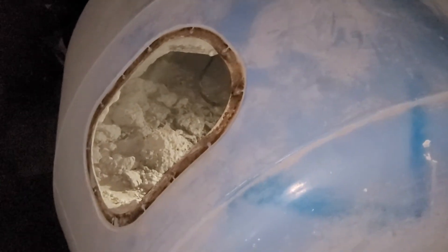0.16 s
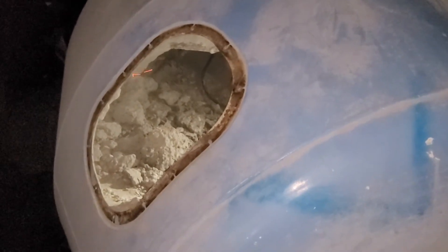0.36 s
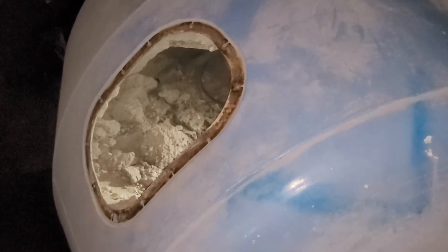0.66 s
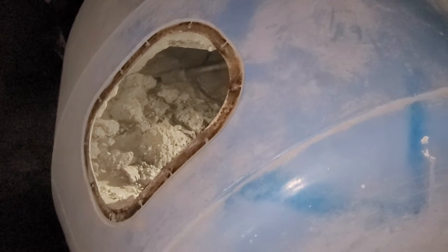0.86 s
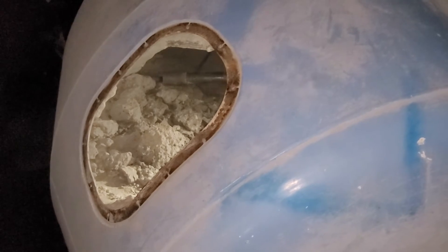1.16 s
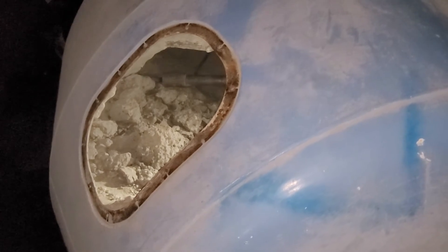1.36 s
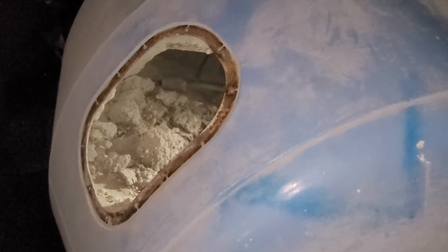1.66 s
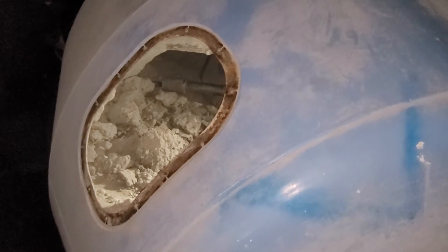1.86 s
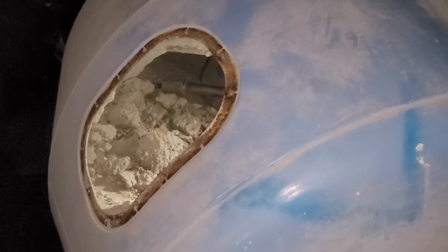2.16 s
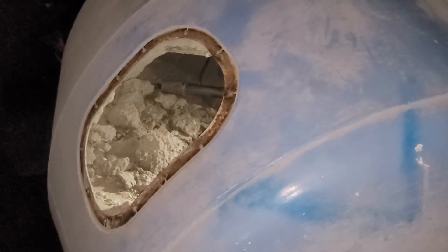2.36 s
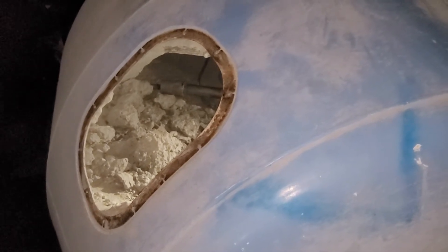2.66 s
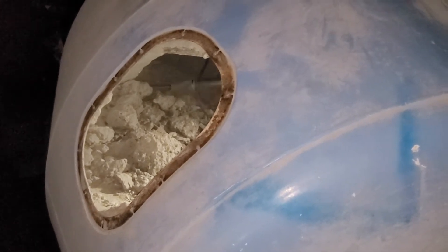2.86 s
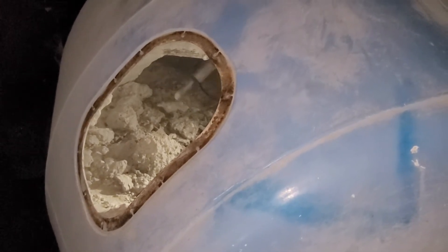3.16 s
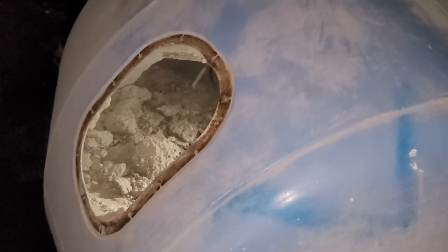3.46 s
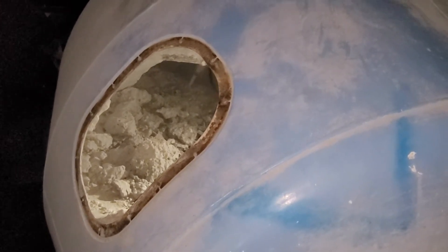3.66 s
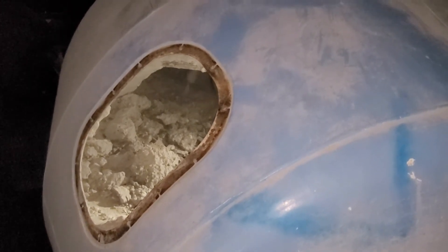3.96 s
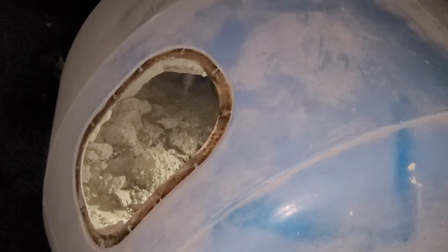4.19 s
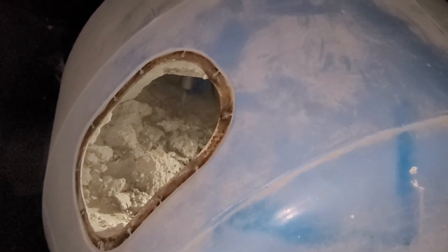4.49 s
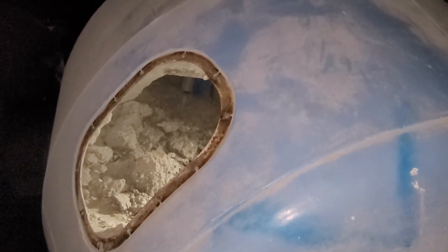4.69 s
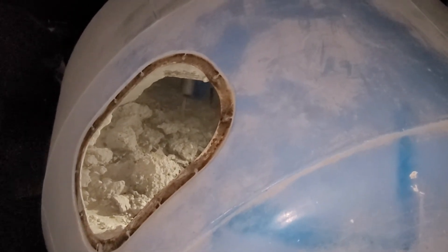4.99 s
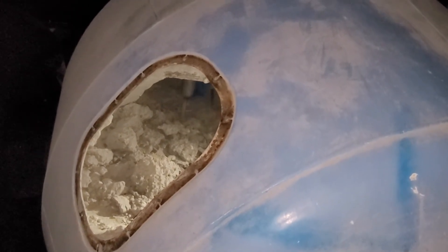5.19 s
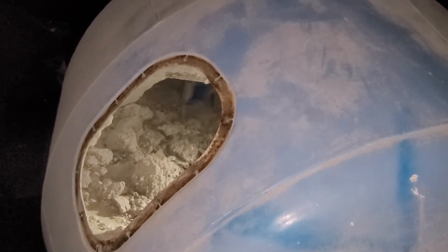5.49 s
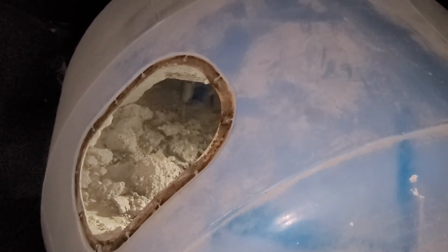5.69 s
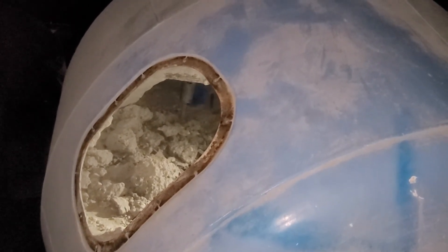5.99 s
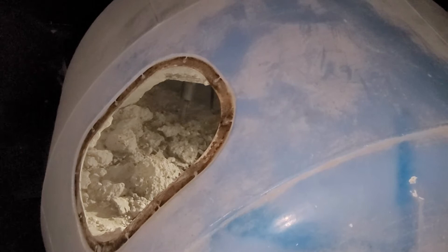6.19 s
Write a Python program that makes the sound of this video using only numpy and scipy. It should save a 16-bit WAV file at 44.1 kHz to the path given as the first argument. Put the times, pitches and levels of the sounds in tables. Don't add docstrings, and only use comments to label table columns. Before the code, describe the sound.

Loud, harsh jackhammer blows ring and boom in a metal mixer drum for half a second, then cut off. The low engine hum and thin hiss gradually come up over about two seconds. The valve groans, the chisel rattles unevenly, then settles into steady rapid hammering that stops abruptly. The engine returns briefly before hammering resumes. Close outdoor recording, short metallic echo, slightly squashed peaks.

```python
import sys
import numpy as np
from scipy import signal
from scipy.fft import rfft, irfft, next_fast_len
from scipy.io import wavfile
from scipy.ndimage import uniform_filter1d

SR = 44100
rng = np.random.default_rng(int(sys.argv[2]) if len(sys.argv) > 2 else 0)


def linear_from_db(decibels):
    return 10 ** (np.asarray(decibels, float) / 20)


def wav_out(sig):
    wavfile.write(sys.argv[1], SR, np.round(np.clip(np.atleast_2d(sig).T, -1, 1) * 32767).astype(np.int16))


N = 279594
SIZE = next_fast_len(N)
TIME = np.arange(N) / SR
TOOL_LAG, YARD_LAG = 2.66, -12.5

# start_s, peak_db
REBOUNDS = [(0.0204, -27), (0.063, -25), (0.1304, -21), (0.4278, -6), (2.6927, -5), (2.7394, -23),
            (2.8012, -10), (2.828, -10), (2.8624, -5), (2.895, -8), (2.9327, -10), (2.961, -18),
            (3.0094, -24), (3.034, -11), (6.1589, -5.5)]


def rms_one(x):
    return x / np.sqrt(np.mean(x ** 2) + 1e-20)


def in_time(spans, off_db=None):
    rows = []
    for span in spans:
        if off_db is None:
            rows += list(span)
            continue
        quiet = [off_db] * (len(span[0]) - 1)
        before = (span[0][0] - 1e-3, *quiet)
        after = (span[-1][0] + 1e-3, *quiet)
        rows += [before, *span, after]
    s, *columns = np.transpose(rows)
    return [np.interp(TIME, s, c) for c in columns]


def pair(alike, lag, gain=1):
    real, imag = rng.standard_normal((2, 3, SIZE // 2 + 1))
    shared, left, right = (real + 1j * imag) * gain
    late = shared * np.exp(-2j * np.pi * np.arange(SIZE // 2 + 1) * lag / SIZE)
    alike = np.clip(alike, 0, 1)
    both = np.sqrt(alike) * np.array([shared, late]) + np.sqrt(1 - alike) * np.array([left, right])
    return rms_one(irfft(both, SIZE)[:, :N])


def coloured(points, alike, lag):
    hz = np.maximum(np.arange(SIZE // 2 + 1) * SR / SIZE, 1)
    point_hz, point_db = np.transpose(points)
    gain = linear_from_db(np.interp(np.log(hz), np.log(point_hz), point_db))
    return pair(alike, lag, gain)


def drift(rate):
    r = np.exp(-80 * np.pi * rate / SR)
    slow = signal.lfilter([1], [1, -2 * r, r * r], rng.standard_normal(N // 40 + 2002))[2000:]
    return np.interp(np.arange(N) / 40, np.arange(len(slow)), rms_one(slow))


def ring(x, hz, t60):
    r, w = linear_from_db(-60 / (t60 * SR)), 2 * np.pi * hz / SR
    return signal.lfilter([0, np.sin(w)], [1, -2 * r * np.cos(w), r * r], x + 1e-18)


def marks(times, levels_db):
    out = np.zeros(N)
    at = np.minimum((np.asarray(times) * SR).astype(int), N - 1)
    np.add.at(out, at, linear_from_db(np.asarray(levels_db)))
    return out


def burst(clicks, hold_s, t60):
    hold = int(hold_s * SR)
    width = 2 * hold + 1
    held = uniform_filter1d(clicks, width, mode="constant") * width
    held = np.concatenate([np.zeros(hold), held])[:N]
    r = linear_from_db(-60 / (t60 * SR))
    tail = signal.lfilter([1], [1, -r], clicks + 1e-18)
    return held + np.concatenate([np.zeros(width), tail])[:N]


def throttle():
    # opens_s, piston_going_s, shuts_s, surge_db, steady_db
    pulls = [
        (-.2, -.1, .505, -20, -18.5),
        (2.624, 2.697, 5.39, -10, -13.5),
        (6.098, 6.155, 6.5, -12, -18.5),
    ]
    surge_rise_db, surge_fall_db_per_s, refill_s, shut_db_per_s = 16.5, 270, 0.06, 500
    air_db, work_db, since = np.full(N, -90.), np.full(N, -90.), np.full(N, np.inf)
    for opens, going, shuts, surge_db, steady_db in pulls:
        gate_db = np.minimum(shut_db_per_s * np.minimum(shuts - TIME, 6.0 * (TIME - opens)), 0)
        rise_db = -surge_rise_db * (going - TIME) / (going - opens)
        surge = linear_from_db(surge_db + np.minimum(rise_db, -surge_fall_db_per_s * (TIME - going)))
        steady = linear_from_db(steady_db) * (1 - np.exp(-np.maximum(TIME - going, 0) / refill_s))
        air_db = np.maximum(air_db, gate_db + 20 * np.log10(surge + steady + 1e-9))
        work_db = np.maximum(work_db, gate_db + np.minimum(2 * rise_db, 0))
        running_or_before = np.where(TIME > going, 0, since)
        since = np.where(TIME > shuts, TIME - shuts, running_or_before)
    return air_db, work_db, since


def blows():
    # start_s, peak_db, ring_db, middle_db
    short = [(0.0447, -1, 0, -16), (0.114, -4.5, -2.5, -15), (0.19, -4.5, 0.5, -13), (0.2688, -2, 0, -18),
             (0.3384, -4.5, -1, -24), (0.4173, -1.5, -3, -7), (0.4946, -5.5, -15, -22), (6.1764, -8, -4, 1),
             (6.2573, -4.5, 3, -23), (6.3314, -6.5, -8, -16)]
    # start_s, peak_db, ring_db, middle_db
    hunting = [(2.7154, -4, -10, -21), (2.7873, -4, 2, -23), (2.8536, -2.5, 4.5, -23), (2.9206, -3, 5, -9),
               (2.993, -2.5, 1.5, -3), (3.07, -3, -1.5, -5), (3.144, -1.5, -5.5, -26),
               (3.2089, -1, -7.5, -26), (3.2748, -3.5, -7.5, -25), (3.345, -5, -7.5, -13),
               (3.4096, -1.5, -11, -26), (3.4754, -2, -2.5, -26), (3.554, -5, -6, -30),
               (3.6169, 1, -14, -31), (3.68, -3.5, -4, -6), (3.7564, -10, 3, 5), (3.8385, -0.5, -2, -10),
               (3.9099, -14.5, -1, 9), (3.9915, -7.5, -9, -2), (4.0721, -5, -4.5, -1.5),
               (4.1507, -2, -3, -23), (4.2228, -7.5, -12, -13), (4.2957, -7, -3.5, -7),
               (4.3782, -5.5, 1, -11)]
    from_s, period_s, count = 4.4538, 0.07698, 13
    even = [(from_s + k * period_s, -6, -5, -13.5) for k in range(count)]
    return np.array([*short, *hunting, *even])


def yard_levels():
    duck_db, recover_s, engine_share, rumble_dies_db_per_s = 14.5, 0.9, 0.63, 50
    since = throttle()[2]
    ducked_db = -duck_db * np.exp(-since / recover_s)
    engine_db = -27.5 + engine_share * ducked_db
    rumble_db = np.maximum(engine_db, -26.5 - rumble_dies_db_per_s * since)
    hiss_db = np.maximum(-37.5 + ducked_db, -46.5 - 4.0 * rumble_dies_db_per_s * since)
    return uniform_filter1d(np.array([engine_db, rumble_db, hiss_db]), int(0.042 * SR))


def yard():
    # multiple, level_db
    orders = [(1, -13), (2, 3), (3, -8), (4, -14), (5, -10), (6, -18), (8, -3.5), (9, -8.5), (11, -11),
              (12, -15.5), (12.6, -6), (19, -20)]
    # pitch_hz, level_db
    whines = [(1130, -67), (1238, -59.5), (1384, -59.5), (1497, -64.5), (1550, -65), (1949, -59.5),
              (2137, -64.5)]
    # freq_hz, density_db [dB per Hz]
    rumble_colour = [(18, -27.5), (30, -21), (59, 4), (81, -6.5), (171, -21.5), (191, -8.5), (213, -7.5),
                     (287, -11.5), (345, -4), (386, -17.5), (684, -12.5), (920, -23), (2500, -27.5),
                     (3250, -58), (5500, -120)]
    # freq_hz, density_db [dB per Hz]
    hiss_colour = [(1180, -8), (2000, -17), (2050, -25), (2760, -9), (2960, -7), (3340, -13), (5680, -16.5),
                   (7840, -19.5), (11700, -13), (16000, -22.5)]
    firing_hz, split_hz, alike_low, alike_high = 28.2, 230, 0.99, 0.46
    engine_db, rumble_db, hiss_db = yard_levels()

    turn = 2 * np.pi * np.cumsum(firing_hz * (1 + 0.00378 * drift(1.34))) / SR
    hum = 0
    for k, db in orders:
        hum = hum + linear_from_db(db + 3.4 * drift(3.7)) * np.sin(k * turn + rng.uniform(0, 6.27))
    above = 1 / (1 + (split_hz / (np.arange(SIZE // 2 + 1) * SR / SIZE + 1)) ** 6)
    body = coloured(rumble_colour, alike_low + (alike_high - alike_low) * above, YARD_LAG)
    engine = linear_from_db(rumble_db - 4.5) * body + linear_from_db(engine_db - 4.0) * rms_one(hum)

    whine = 0
    for hz, db in whines:
        phase = 2 * np.pi * hz * TIME + 1.84 * drift(5.7)
        whine = whine + linear_from_db(db + 4.5 + 2.1 * drift(11.0)) * np.sin(phase)
    hiss = linear_from_db(hiss_db + 0.35 * drift(23)) * coloured(hiss_colour, 0.081, YARD_LAG)
    return (engine + linear_from_db(hiss_db + 41.5) * whine + hiss) * linear_from_db(np.array([[-0.6], [0.6]]))


def chips():
    # start_s, peak_db, ring_hz
    drops = [(.8285, -41, 4740), (0.919, -38, 4460), (0.9425, -39, 4370), (0.9425, -41, 1410),
             (.92, -48, 10300), (2.675, -31, 1360), (2.685, -35, 1490), (5.5114, -31.5, 15700),
             (5.5114, -43, 4840), (5.6705, -43, 4500), (5.762, -42, 4600)]
    tick, out = pair(0.44, TOOL_LAG), 0
    for s, db, hz in drops:
        touch = burst(marks([s], [db]), 0.0008, 0.02) * tick
        out = out + linear_from_db(-4.5) * touch + linear_from_db(-18) * ring(touch, hz, 51.0 / hz)
    return out


def groans():
    # start_s, pitch_hz, level_db
    glides = [
        [(2.705, 831, -35), (2.72, 804, -29), (2.74, 663, -22), (2.765, 590, -29)],
        [(2.72, 800, -45), (2.75, 798, -29), (2.783, 737, -31), (2.795, 736, -45)],
        [(6.225, 3380, -43), (6.238, 3330, -38), (6.254, 4360, -30), (6.258, 4500, -54)],
    ]
    out = 0
    for rows in glides:
        hz, = in_time([np.array(rows)[:, :2]])
        level_db, = in_time([np.array(rows)[:, ::2]], off_db=-93.5)
        rough_db = 4 * drift(120)
        phase = 2 * np.pi * np.cumsum(hz * (1 + 0.028 * drift(92))) / SR
        out = out + linear_from_db(level_db + rough_db) * np.sin(phase)
    return out


def shell():
    # freq_hz, t60_s
    modes = [(50, 0.37), (108, 0.42), (169, 1.31), (234, 0.17)]
    modes_db = [-5.5, -6.5, -6.5, -11]
    # start_s, level_db, tilt_db [dB per octave]
    boom = [(0, -21, -2.5), (.2, -24, -0.5), (.4, -24, 6), (.55, -29, -0.5), (.75, -35, -2.5),
            (1.2, -41.5, -4), (2.66, -44, -4), (2.76, -24.5, -1), (2.95, -27.5, 0.5), (3.4, -20, 0),
            (3.75, -20.5, -3), (4.2, -20.5, 0.5), (4.7, -21, 0.5), (5.35, -23, 1.5), (5.7, -35, -2.5),
            (6.08, -40, -4), (6.2, -19.5, 1), (6.34, -21.5, -5.5)]
    evenness = 0.82
    s, out = blows()[:, 0], 0
    shake_db, tilt_db = in_time([boom])
    for (hz, t60), mode_db in zip(modes, modes_db):
        level_db = shake_db + mode_db + tilt_db * np.log2(hz / 100)
        push = marks(s, 3.0 * rng.standard_normal(len(s))) + 0.035 * pair(0.93, TOOL_LAG)
        wave = ring(ring(push, hz, 0.036), hz, t60)
        local_rms = np.sqrt(uniform_filter1d(wave[0] ** 2, int(0.12 * SR)))
        out = out + linear_from_db(level_db) * wave / local_rms ** evenness / np.std(wave) ** (1 - evenness)
    return out * linear_from_db(np.array([[-0.4], [0.4]]))


def air():
    # freq_hz, density_db [dB per Hz]
    air_colour = [(900, -9), (2000, -8.5), (4050, 0.5), (6330, -6.5), (9000, 0), (11800, 2.5), (14000, -6),
                  (16000, 1.5)]
    # start_s, crumbling_db
    bite = [(0, -37.5), (.5, -38.5), (2.7, -26), (2.85, -39.5), (3.3, -42.5), (3.5, -38.5), (3.8, -52.5),
            (4.2, -48), (4.5, -42.5), (4.9, -31.5), (5.3, -44), (5.43, -38.5), (6.15, -28), (6.34, -33)]
    # freq_hz, density_db [dB per Hz]
    grit_colour = [(900, 10), (2000, -37), (3000, 7), (4500, 1), (6500, 5.5), (10000, -36)]
    closing = burst(marks(blows()[:, 0], 0)[::-1], 0.004, 0.32)[::-1]
    air_db, work_db, _ = throttle()
    bite_db, = in_time([bite])
    rush_db = air_db + 0.53 * (bite_db + 35) - 2.5 + 1.0 * drift(40)
    rush = linear_from_db(rush_db) * coloured(air_colour, 0.45, TOOL_LAG)
    grit = linear_from_db(bite_db + work_db + 5.5 * drift(122)) * coloured(grit_colour, 1.0, TOOL_LAG)
    return linear_from_db(-12.0 * np.minimum(closing, 1)) * (rush + grit)


def shards():
    level_db, spread_db, t60_s, low_hz, high_hz = -24, 5, 0.06, 7000, 15940
    out, t = np.zeros((2, N + SR)), np.arange(SR // 10) / SR
    for s, peak_db, *_ in blows():
        share, late, left, right = rng.random((4, 5, 1))
        hz = low_hz + share * (high_hz - low_hz)
        after = np.maximum(t - 0.008 * late, 0)
        splinter_db = peak_db + level_db + spread_db * rng.standard_normal((5, 1))
        dying = linear_from_db(splinter_db - 60 * after / t60_s) * (after > 0)
        start = int(s * SR)
        for side, turn in enumerate((left, right)):
            waves = dying * np.sin(2 * np.pi * (hz * after + turn))
            out[side, start:start + len(t)] += waves.sum(axis=0)
    return out[:, :N]


def chisel():
    # freq_hz, width_hz
    modes = [(4270, 200), (6260, 76), (7860, 84), (9695, 50), (10020, 55), (12020, 78), (12290, 60),
             (12800, 79), (14020, 64), (14440, 48), (15390, 120)]
    modes_db = [-3, -6.5, 5.5, 0, -20, -3.5, -5, -16, -24, -23, -10]
    # start_s, clank_db (two lowest modes), third_db (third mode),
    # lean_db (upper over lower of the two loudest modes)
    seat = [(0, -6, -27, 5), (.34, -11, -28, 4), (.42, -10, -3.5, 4), (.5, -8, -19, 3),
            (2.72, -0.5, -9.5, 9), (2.98, -4.5, -2.5, -4.5), (3.15, -2, -22, -8), (3.6, -1.5, -22, -8),
            (3.76, -22, -1.5, -4), (3.9, -17, -10, -5.5), (4.2, -12.5, -24, -9), (5.0, -3, -45, 6.5),
            (5.4, -2.5, -21, -2), (6.17, -15, -36, 4), (6.26, -5.5, -0.5, -4)]
    pair_hz, clank_below_hz = 12150, 7000
    s, peak_db, ring_db, middle_db = blows().T
    weak_s, weak_db = np.transpose(REBOUNDS)
    chatter = (rng.random(N) < 250 / SR) * linear_from_db(1.34 * rng.standard_normal(N))
    rattle = 0.22 + burst(chatter, 0.00057, 0.0011)
    steel, shake = 0, pair(0.45, TOOL_LAG)
    clank_db, third_db, lean_db = [c[(s * SR).astype(int)] for c in in_time([seat])]
    for (hz, width_hz), level_db in zip(modes, modes_db):
        if hz < clank_below_hz:
            group_db = clank_db
        elif hz <= 9000:
            group_db = third_db
        elif hz <= 11000:
            group_db = middle_db
        elif hz < 13500:
            group_db = ring_db
        else:
            group_db = -8.0
        loose_db = lean_db * np.sign(hz - pair_hz) * (abs(hz - pair_hz) < 400)
        strike = marks(s, peak_db + group_db + loose_db + 1.34 * rng.standard_normal(len(s)))
        sharp = strike + marks(weak_s, weak_db - 16.5)
        push = np.array([sharp, np.roll(sharp, round(TOOL_LAG))])
        push = push + linear_from_db(-22.0) * rattle * burst(strike, 0.002, 0.12) * shake
        steel = steel + linear_from_db(level_db) * ring(push, hz, 2.82 / width_hz)
    return steel


def hammer():
    # freq_hz, density_db [dB per Hz]
    crack_colour = [(880, -39), (1500, -22), (3410, -11.5), (4160, -2), (7170, -9.5), (7760, 2.5),
                    (9100, -2), (11200, 1), (12000, -5.5), (16000, -2)]
    # freq_hz, density_db [dB per Hz]
    thud_colour = [(150, -23), (260, 6.5), (303, -16), (339, -2), (398, -4), (758, -6), (1060, -11),
                   (1710, -16), (2500, -14.5), (3250, -10.5), (5500, -120)]
    s, peak_db = blows().T[:2]
    weak_s, weak_db = np.transpose(REBOUNDS)
    hits = marks(s, peak_db) + marks(weak_s, weak_db - 0.5)
    crack = linear_from_db(-7) * burst(hits, 0.001, 0.016) * coloured(crack_colour, 0.39, TOOL_LAG)
    exhaust = coloured(crack_colour, 0.55, TOOL_LAG)
    puff = burst(marks(s, peak_db), 0.004, 0.092) * linear_from_db(-14.0 + 2.9 * drift(120)) * exhaust
    thud = burst(marks(s, -18.5 + peak_db), 0.0011, 0.058) * coloured(thud_colour, 0.31, TOOL_LAG)
    tick_band = signal.butter(2, [900, 4500], "band", fs=SR, output="sos")
    edge = signal.sosfilt(tick_band, exhaust[:, ::-1])
    tick = linear_from_db(-11.5) * burst(hits, 0.00036, 0.0073) * rms_one(edge)
    return crack + tick + puff + linear_from_db(-6.5) * chisel() + linear_from_db(np.array([[5.0], [1.0]])) * thud


def drum_echo(x):
    t60_s, cut_hz = 0.14, 2700
    size = next_fast_len(N + SR)
    w = 2 * np.pi * np.arange(size // 2 + 1) / size
    dull = 1 / (1 + 1j * w * SR / (2 * np.pi * cut_hz))
    lags = rng.uniform(0.0055, 0.031, (4, 2, 1)) * SR
    loops = linear_from_db(-60 * lags / SR / t60_s) * dull * np.exp(-1j * w * lags)
    echoes = (loops / (1 - loops)).sum(axis=0)
    return irfft(rfft(x.mean(axis=0), size) * echoes, size)[:, :N]


def scene():
    far = yard() + shell()
    tool = chips() + groans() + hammer()
    near = tool + linear_from_db(-21.5) * drum_echo(tool) + air() + shards()
    return near * linear_from_db(np.array([[-1.2], [1.2]])) + far


def low_pass(x):
    return signal.sosfilt(signal.butter(12, 17000, fs=SR, output="sos"), x)


def record(dry):
    low_hz, top_hz, ceiling = 41, 16300, 0.88
    heard = signal.sosfilt(signal.butter(4, low_hz, "high", fs=SR, output="sos"), dry)
    rounded = ceiling * np.tanh(heard / ceiling)
    mix = signal.sosfilt(signal.cheby2(12, 60, top_hz, fs=SR, output="sos"), rounded)
    return low_pass(mix)


dry = scene()
out = record(dry)
wav_out(out)
```